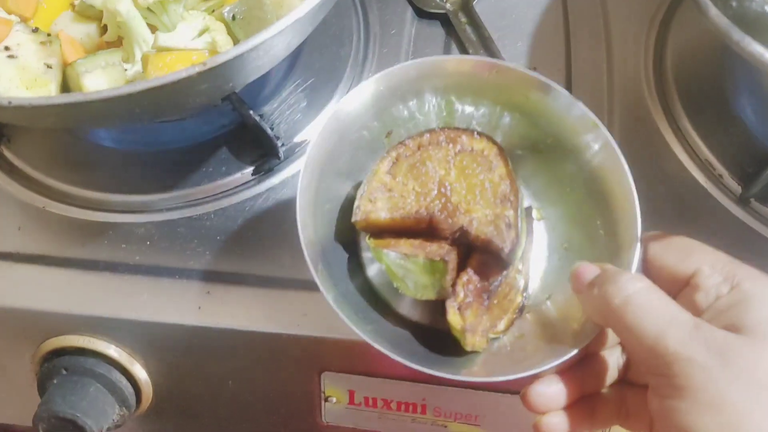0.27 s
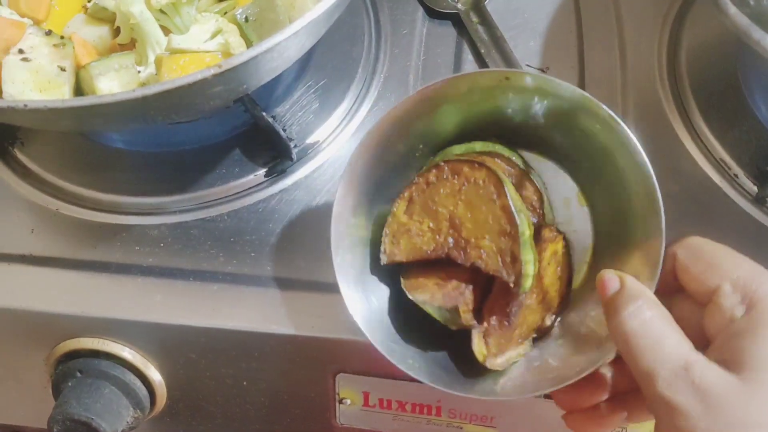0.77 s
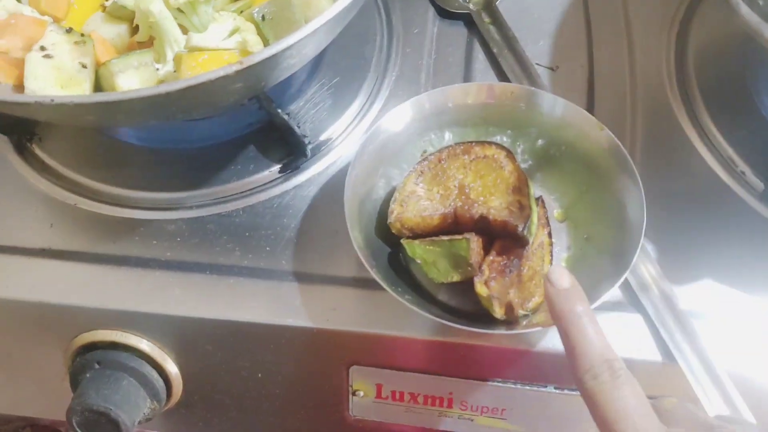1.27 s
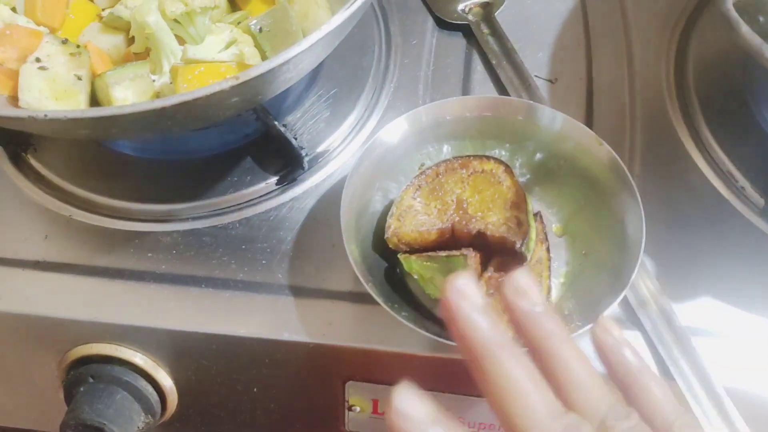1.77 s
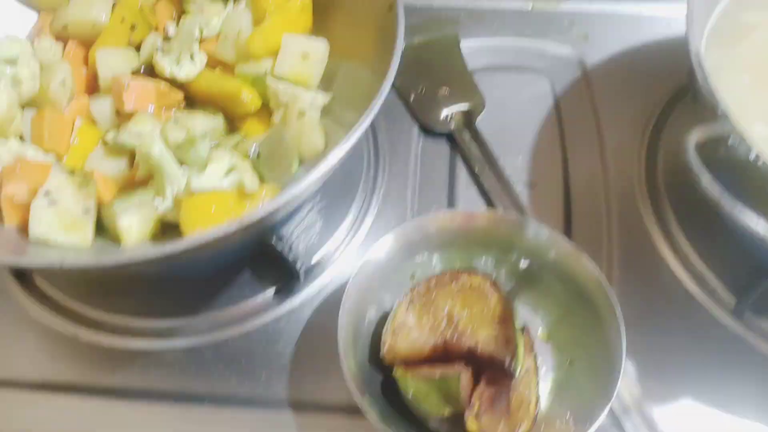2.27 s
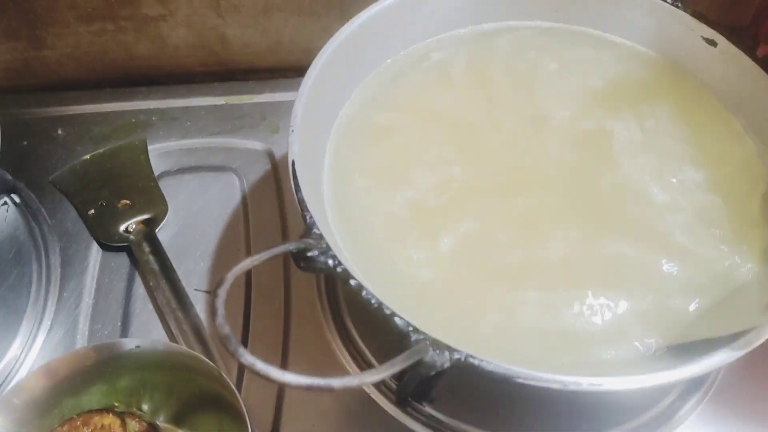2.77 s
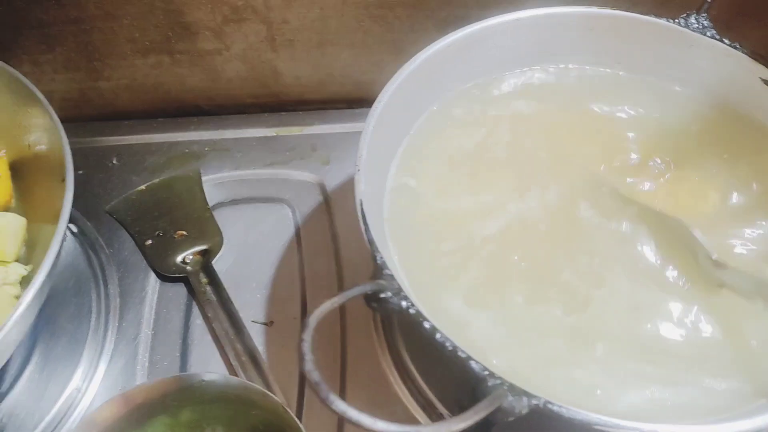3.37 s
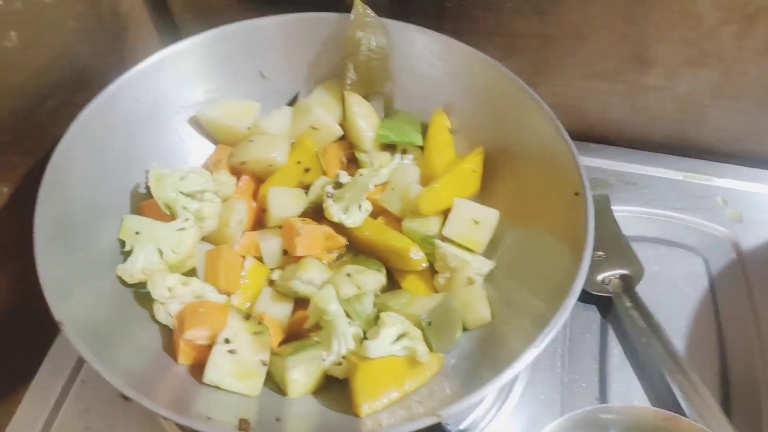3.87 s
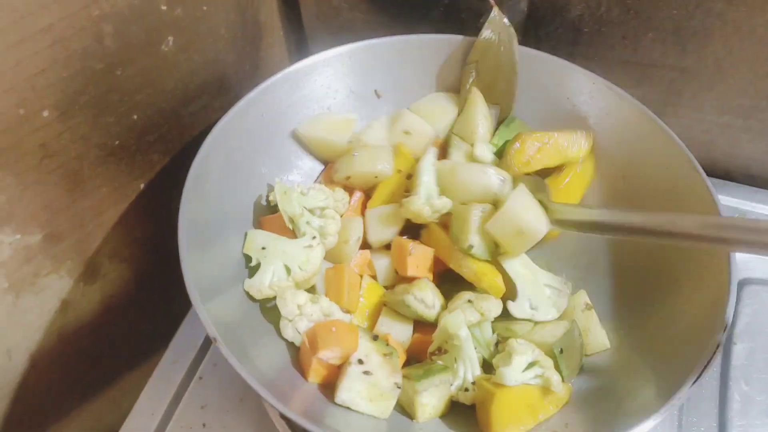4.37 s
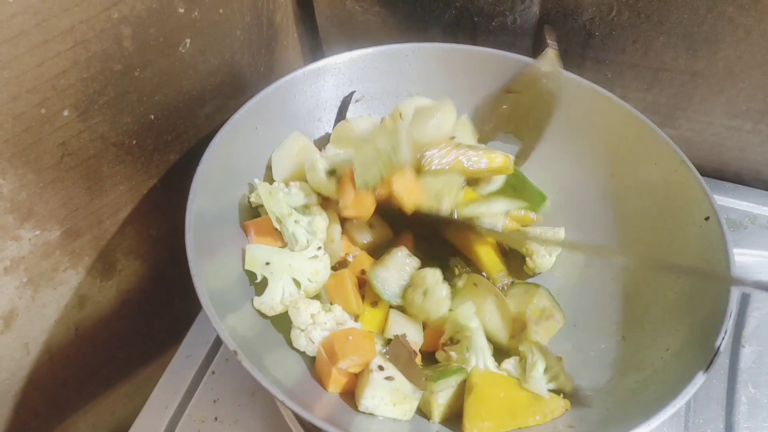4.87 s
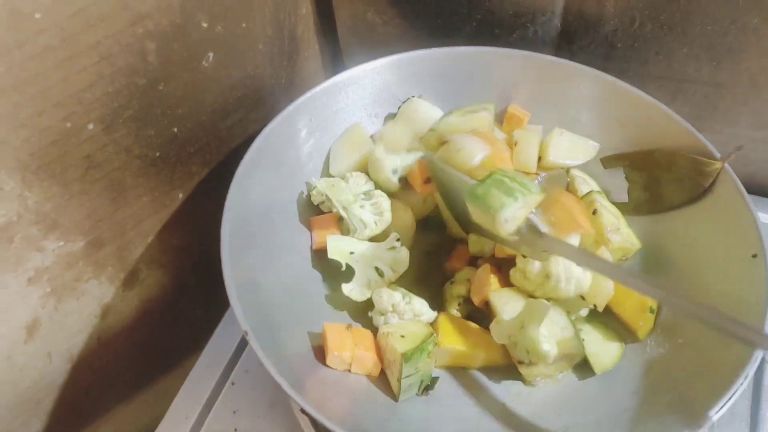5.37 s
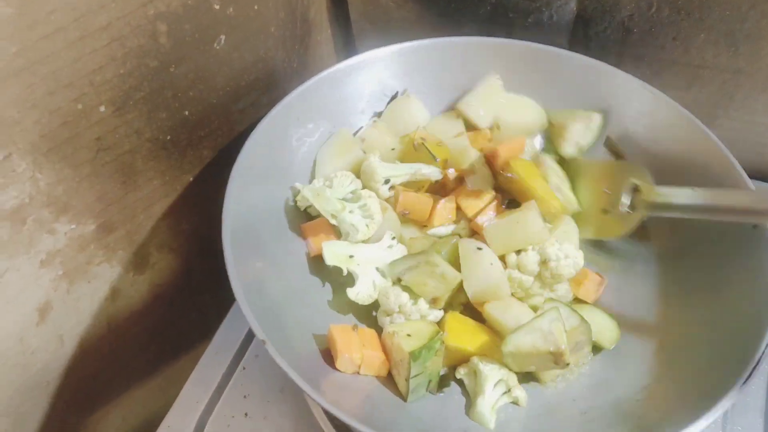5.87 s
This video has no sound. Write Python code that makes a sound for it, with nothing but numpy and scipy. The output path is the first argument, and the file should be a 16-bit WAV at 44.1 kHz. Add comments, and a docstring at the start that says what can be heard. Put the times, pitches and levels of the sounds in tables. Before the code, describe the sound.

Vegetables fizz and pop in hot oil while a steel bowl knocks on a hob and a spatula stirs a wok.

```python
"""Vegetables frying in a wok

Water in hot oil bursts in a fizz of tiny bubbles and louder pops; the fizz swells with the stirring.
A hand-held pair of microphones swings from a small bowl to a pot and on to the wok.
The bowl knocks on the steel hob, a ladle rubs the pot as its broth gulps, a handle pings once,
and a spatula rubs and taps the wok. Gas burners rumble underneath."""
import sys
import numpy as np
from scipy import signal
from scipy.fft import rfft, irfft
from scipy.io import wavfile
from scipy.ndimage import uniform_filter1d

SR = 44100
rng = np.random.default_rng(int(sys.argv[2]) if len(sys.argv) > 2 else 0)


def put_to_file(sound):
    """Save the sound as 16-bit audio at rate SR, in the file named by the first command-line argument."""
    columns = np.atleast_2d(sound).T  # one column per channel
    safe = np.clip(columns, -1, 1)
    whole_steps = np.round(safe * 32767)
    wavfile.write(sys.argv[1], SR, whole_steps.astype(np.int16))


N = 269539

# Levels in the tables are relative.
# Strength of the frying: (time [s], level [dB])
FIZZ_LEVEL = [(0.0, -35), (0.46, -38), (0.64, -40), (0.84, -40), (1.26, -35), (1.4, -37), (1.68, -38),
              (1.77, -31), (1.85, -36), (2.0, -38), (2.05, -39.5), (2.29, -38), (2.39, -39), (2.83, -39),
              (3.01, -42), (3.26, -41), (3.44, -39), (3.75, -37), (3.92, -31.5), (4.2, -31), (4.3, -29),
              (4.59, -23), (4.912, -22), (5.098, -18.5), (5.576, -19.5), (6.11, -18)]
# Large bubbles: (time [s], level [dB], pitch [Hz], snap weight [dB])
OIL_POPS = [(0.0396, -15.5, 2800, -7.5), (0.0606, -15, 4050, -21), (0.0743, -5.5, 3740, -10.5),
            (0.1376, -9.5, 3940, -33), (0.258, -21, 3100, -27), (0.2814, -16, 3960, -19),
            (0.3022, -19.5, 3900, -24), (0.3561, -22, 4080, -32), (0.3735, -21, 4150, -29),
            (0.398, -24, 4030, -13), (0.426, -21.5, 4100, -5), (0.4725, -20, 6100, -11),
            (0.4975, -24.5, 7000, -6), (0.5, -14.5, 3820, -13.5), (0.5467, -26.5, 2880, -21),
            (0.5648, -16, 6100, -15), (0.6062, -13, 4000, -11.5), (0.7712, -18, 2080, -29),
            (0.8607, -22, 6000, -21), (0.8928, -14.5, 2980, -18), (0.9073, -16.5, 3870, -12),
            (0.983, -22, 8650, -24), (1.0505, -24, 6020, -20), (1.072, -15, 3820, -11),
            (1.1329, -11, 3900, -26), (1.1527, -11, 3700, -32), (1.214, -13.5, 5800, -31),
            (1.2424, -23, 3020, -22), (1.2435, -12, 5340, -25), (1.2865, -14.5, 5000, -29),
            (1.2937, -14.5, 5100, -25), (1.305, -15, 6600, -34), (1.3443, -22.5, 5500, -26),
            (1.4023, -19, 3880, -18), (1.4349, -11.5, 6060, -23), (1.4468, -10.5, 4127, -9),
            (1.5047, -16.5, 4060, -30), (1.5474, -22, 6360, -13.5), (1.5699, -16, 5170, -37),
            (1.6125, -19, 5350, -34), (1.6306, -9.5, 6260, -25), (1.7055, -10, 7400, -13),
            (1.74, -12, 6070, -11), (1.7589, -10.5, 5280, -25.5), (1.775, -21, 7440, -15.5),
            (1.819, -18.5, 6040, -24), (1.8558, -20, 4650, -16), (1.914, -23.5, 4000, -23),
            (1.9423, -8.5, 5344, -14.5), (2.0009, -25.5, 7400, -21.5), (2.0202, -17, 6100, -27),
            (2.0303, -16.5, 5430, -12), (2.0726, -11.5, 4060, -23), (2.114, -23.5, 3873, -23.5),
            (2.2048, -18.5, 3700, -14.5), (2.2386, -9.5, 5870, -13), (2.2608, -28.5, 4034, -16),
            (2.304, -28.5, 3880, -14), (2.3296, -19.5, 4270, -29), (2.3552, -17.5, 2654, -26),
            (2.391, -15, 4900, -19), (2.4082, -12, 5860, -24.5), (2.4324, -11, 5380, -20.5),
            (2.586, -24.5, 7950, -11), (2.595, -21.5, 4394, -12), (2.6237, -17.5, 6300, -16),
            (2.6525, -9.5, 4280, -14), (2.7021, -6, 4460, -15.5), (2.7488, -11, 4400, -25),
            (2.7658, -7.5, 4730, -25), (2.7802, -15, 4630, -11), (2.833, -17, 2070, -20),
            (2.8888, -25, 2230, -18), (2.9562, -16, 5390, -24.5), (3.0195, -19.5, 5250, -17),
            (3.0904, -10, 5250, -18), (3.1313, -17, 6280, -14.5), (3.2026, -27, 2620, -9),
            (3.2192, -14, 2027, -16.5), (3.231, -16, 5300, -12.5), (3.275, -9.5, 4830, -25),
            (3.3031, -11, 5400, -18), (3.3774, -22, 6360, -7.5), (3.4491, -17.5, 4000, -25),
            (3.464, -13, 4320, -23.5), (3.4817, -10.5, 4330, -15.5), (3.5145, -15, 3430, -23),
            (3.5367, -7, 5064, -26.5), (3.5819, -14.5, 5170, -24), (3.613, -22, 4300, -18),
            (3.6969, -11.5, 4396, -23), (3.7228, -15.5, 5360, -18), (3.7932, -15, 4070, -16),
            (3.8237, -10, 6045, -18.5), (3.8504, -8, 5360, -31), (3.9103, -4, 2553, -33),
            (3.9414, -13.5, 6600, -17), (3.9513, -8.5, 4250, -22), (4.0183, -15, 5220, -21),
            (4.0374, -9.5, 5100, -16.5), (4.0612, -8, 6226, -26), (4.1077, -12, 4095, -32.5),
            (4.1197, -9, 3180, -28), (4.162, -18.5, 2160, -29), (4.1784, -18, 7280, -24),
            (4.2242, -9.5, 5450, -17), (4.272, -13, 5490, -18.5), (4.3097, -9.5, 5430, -19),
            (4.3488, -14, 3220, -21), (4.3683, -10.5, 3120, -19), (4.375, -7, 2140, -25),
            (4.428, -10.5, 5900, -14.5), (4.444, -0.5, 7370, -23), (4.5116, -8.5, 6537, -11.5),
            (4.5233, -3.5, 7250, -19.5), (4.5526, -7.5, 6023, -17.5), (4.5915, -9, 4000, -25),
            (4.6133, -5, 5550, -25), (4.6386, -9, 7640, -17.5), (4.657, -2, 8800, -30),
            (4.704, -10, 4046, -14), (4.7119, -8.5, 6170, -19.5), (4.749, -7, 6585, -25),
            (4.8073, -6, 4400, -23.5), (4.8592, -5, 3222, -20), (4.8928, -4.5, 4670, -21.5),
            (4.9294, -7.5, 6236, -17), (4.9734, -6, 6340, -14.5), (4.9999, -8.5, 6130, -18.5),
            (5.0504, -3.5, 5603, -17.5), (5.09, -5, 6600, -19), (5.188, -5, 6440, -15.5),
            (5.2099, -3.5, 4066, -17), (5.2514, -4.5, 5740, -15), (5.347, -8, 2670, -20),
            (5.38, -4.5, 5540, -17.5), (5.4147, -2.5, 4270, -18.5), (5.4625, -8.5, 2236, -15),
            (5.4875, -5.5, 3280, -20), (5.5116, -6.5, 5500, -15), (5.556, -3, 5110, -19),
            (5.5803, -5, 3220, -14.5), (5.6285, -4.5, 5270, -11), (5.6984, -4.5, 7200, -14.5),
            (5.7434, -1.5, 2940, -21.5), (5.765, -4.5, 5797, -18), (5.7873, -2, 9060, -12),
            (5.8356, -3, 5600, -38), (5.8862, -6, 5920, -28), (5.9046, -11, 5830, -18),
            (5.9238, -2.5, 6160, -19.5), (5.9708, -4.5, 4880, -16.5), (5.997, -7.5, 5430, -18),
            (6.0914, -3.5, 6400, -22)]
# Microphone aim: (time [s], vessel [0 bowl, 1 pot, 2 wok], left lag [ms], left minus right [dB])
MIC_AIM = [(0, 0, 0.25, -8), (2.3, 0, 0.2, -7.5), (2.42, 1, 0.31, -6.5), (3.6, 1, 0.33, -6.5),
           (3.8, 2, 0.06, -6), (4.5, 2, 0.04, -4.5), (6.11, 2, 0.03, -4)]
# Spectrum of the fizz at each aim: (frequency [Hz], level [dB])
BOWL_FIZZ = [(410, -92), (700, -31), (1090, -29), (1500, -21), (1950, -23.5), (2310, -27.5), (2840, -16.5),
             (3360, -22.5), (3700, -15.5), (3930, -10), (4180, -13.5), (4710, -20.5), (5100, -17.5),
             (6110, -15), (8450, -21), (9300, -28), (12200, -35), (15600, -30)]
POT_FIZZ = [(410, -59), (700, -49), (800, -14), (1390, -20.5), (2220, -8.5), (2810, -14), (3150, -13.5),
            (3360, -9), (3600, -16.5), (3980, -7), (4480, -9), (5800, -11.5), (6600, -9.5), (7350, -20.5),
            (8400, -19.5), (10000, -15.5), (11900, -26.5), (12700, -25), (15600, -28)]
WOK_FIZZ = [(410, -57), (660, -22.5), (797, -33), (907, -22.5), (1390, -12.5), (2160, -12.5), (2340, -14),
            (3240, -9), (5950, -8), (7500, -10.5), (10000, -19.5), (11700, -21), (15600, -19)]
# Imbalance of the fizz: (frequency [Hz], left minus right [dB])
LEFT_COLOUR = [(700, 9.5), (1300, 1.5), (2400, 5), (4400, -5), (8000, 2), (15000, 6)]
# Spectrum of a pop's snap against that of the fizz: (frequency [Hz], level [dB])
SNAP_COLOUR = [(700, -0.5), (2500, 1), (6000, -2.5), (12000, 9), (15600, 9.5)]
# Bowl striking the hob: (time [s], level [dB], hardness [0-1])
BOWL_KNOCKS = [(0.071, -23.5, 0.2), (0.603, -15, 0.46), (0.611, -15, 0.73), (0.635, -33, 0.1),
               (0.671, -36, 0.01), (0.769, -33.5, 0.5), (0.86, -17, 0.5), (0.868, -15.5, 0.63),
               (0.893, -29.5, 0.75), (0.924, -37, 1), (0.936, -13.5, 0.15), (0.961, -23, 0.4),
               (1.157, -28, 0.3), (1.164, -34.5, 1), (1.194, -37, 0.7)]
# Spatula striking the wok: (time [s], level [dB])
SPATULA_TAPS = [(4.348, -18), (4.4049, -14), (4.5353, -19), (4.555, -16.5), (4.6139, -15.5), (4.9756, -15),
                (5.2505, -10), (5.3228, -19), (5.3462, -10.5), (5.3624, -14), (5.4252, -12.5),
                (5.5543, -12), (5.744, -12), (5.7832, -11), (5.8642, -9), (5.904, -13), (5.9707, -10),
                (6.0152, -13), (6.0657, -11.5)]
# Modes of the hob plate and the loaded wok: (frequency [Hz], level [dB], T60 [s])
HOB_MODES = [(174, -12, 0.074), (255, 1, 0.064), (324.5, 5, 0.04), (420.6, -5.5, 0.13), (572, 3.5, 0.018),
             (672.6, 1.5, 0.062), (876, -2.5, 0.027), (1177, -11.5, 0.067), (1597, -11, 0.03)]
WOK_MODES = [(970.4, -13, 0.0087), (1340, -8, .014), (1790, -8, 0.011), (2132, -10.5, 0.012),
             (2760, -11.5, 0.021)]
# Strokes of the ladle, then the spatula: (time [s], length [s], rub level [dB], thud level [dB])
STROKES = [(3.126, 0.14, -44.5, -61), (3.304, 0.16, -41, -80), (3.432, 0.062, -48, -69),
           (3.634, 0.14, -50.5, -72), (4.323, 0.12, -41, -35.5), (4.43, 0.12, -43, -37.5),
           (4.61, 0.14, -60, -44), (4.877, 0.26, -49.5, -45), (5.104, 0.29, -46, -47.5),
           (5.343, 0.18, -42, -43.5), (5.51, 0.36, -40.5, -43.5), (5.792, 0.25, -48, -45.5),
           (5.996, 0.11, -49, -66)]
# Spectra of wall friction and tumbling food: (frequency [Hz], level [dB])
RUB_SPECTRUM = [(150, -39), (350, -1), (600, -1.5), (950, 6.5), (1300, 7.5), (1800, -17.5)]
THUD_SPECTRUM = [(50, -29), (120, -10.5), (220, -1.5), (320, -1), (600, -18)]
# Air pockets round the ladle: (time [s], level [dB], pitch [Hz])
BROTH_PLOPS = [(3.197, -35.5, 350), (3.372, -34, 903), (3.381, -33.5, 1200), (3.441, -29, 980)]
# Spectra of the flames and the gas jets: (frequency [Hz], level [dB])
FLAME_SPECTRUM = [(12, -33), (25, -39), (54, -30), (110, -8.5), (145, -2.5), (170, -1.5), (215, -13),
                  (330, -13.5), (1500, -31)]
JET_SPECTRUM = [(250, -43), (410, -6.5), (470, -4), (586, 1), (715, -12.5), (812, -8), (1400, -27.5),
                (2000, -10)]
# Strength of the burners: (time [s], flame level [dB], jet level [dB])
BURNER_LEVELS = [(0.0, -59, -50.5), (1.09, -56, -47), (1.43, -57, -48), (4.34, -58, -51.5),
                 (5.62, -63, -44), (6.11, -70, -62.5)]
# Response of the microphones: (frequency [Hz], gain [dB])
MIC_RESPONSE = [(1000, 1.5), (12300, 1), (14000, -9.5), (15500, -5)]

FIZZ_SPECTRA = [BOWL_FIZZ, POT_FIZZ, WOK_FIZZ]
SCATTER_DB = 4.5  # bursts lie up to this far left or right of the aim


def fizz(base_per_s=1300, pitches=20):
    """Shot noise: tiny steam bubbles burst in clumps, more often and higher the louder the frying."""
    _, _, pan_db = in_time(MIC_AIM)
    level_db = 10 * np.log10(from_db(2 * in_time(FIZZ_LEVEL)[0]) + sputter())
    vigour_db = level_db + 30
    rate = base_per_s * from_db(.6 * vigour_db + 2 * drift(30))
    draws = rng.random((N, 5))
    at = np.flatnonzero(draws[:, 4] < np.minimum(rate, 12000) / SR)
    strength, polarity, pitch, side, _ = draws[at].T
    height = from_db(2 * np.minimum(-np.log(strength), 4)) * np.sign(polarity - .5)
    pan_db = pan_db[at] + SCATTER_DB * (2 * side - 1)
    when, gains = arrivals(at / SR, height, pan_db, echo_db=-2.5, echo_ms=4.4, wander_ms=.11)
    low_bias = from_db(1.2 * drift(15)[at] - .15 * vigour_db[at])
    band = (pitches * pitch ** low_bias).astype(int)
    bubbles = 0
    for k, hz in enumerate(np.geomspace(1000, 14000, pitches)):
        clicks = impulses(when[band == k], gains[band == k])
        bubbles += (hz / 4000) ** 1.254 * bubble_burst(clicks, hz)
    bubbles[0] = colour(bubbles[0], LEFT_COLOUR)[0]
    out = sum(facing(k) * rms_one(colour(bubbles, spectrum)) for k, spectrum in enumerate(FIZZ_SPECTRA))
    running_rms = np.sqrt(uniform_filter1d(np.mean(out ** 2, axis=0), size=SR // 10))
    return from_db(level_db) * out / running_rms  # level independent of burst rate


def bubble_burst(clicks, hz, cycles=17):
    """Bubble resonance: a bright crack, then a brief ring at a pitch set by the bubble's size."""
    crack = signal.lfilter([1], [1, .5], clicks + 1e-18)
    return ring(clicks, hz, cycles / hz) + .06 * crack


def sputter(rise_s=.0034, t60=.15, flare_db=-23.5):
    """Exponential relaxation: each pop throws up droplets, so the fizz's power flares and sinks back."""
    times, level_db, _, _ = np.transpose(OIL_POPS)
    kicks = np.full(N, 1e-18)
    np.add.at(kicks, (times * SR).astype(int), from_db(2 * (level_db + flare_db)))
    rise, fall = np.exp(-1 / (rise_s * SR)), from_db(-120 / (t60 * SR))
    return signal.lfilter([1 - rise], np.convolve([1, -rise], [1, -fall]), kicks)


def pops(t60=.0028, ring_db=-3, snap_boost_db=28):
    """Impulse excitation: each large bubble bursts with a broad snap and a ring that swells and dies."""
    times, level_db, hz, snap_db = np.transpose(OIL_POPS)
    _, _, pan_db = in_time(MIC_AIM)
    pan_db = pan_db[(times * SR).astype(int)] + SCATTER_DB * rng.uniform(-1, 1, len(times))
    when, gains = arrivals(times, from_db(level_db), pan_db, echo_db=-7, echo_ms=6.7, wander_ms=.042)
    span = 1024
    rings = np.full((2, N + span), 1e-18)
    for k, first in enumerate(when.min(axis=(1, 2))):
        clicks = impulses(when[k:k + 1] - first, gains[k:k + 1], span)
        pop = ring(ring(clicks, hz[k], t60), hz[k], t60)
        peak = np.sqrt(np.mean(np.max(pop ** 2, axis=1)))
        rings[:, first:first + span] += from_db(level_db[k] + ring_db) * pop / peak
    out = highpass(rings[:, :N], 1000, order=3)
    snap_gains = gains * from_db(snap_db + snap_boost_db)[:, None, None]
    snaps = colour(impulses(when, snap_gains), SNAP_COLOUR)
    for k, spectrum in enumerate(FIZZ_SPECTRA):
        top_db = np.max(spectrum, axis=0)[1]
        out += from_db(-top_db) * colour(facing(k) * snaps, spectrum)
    return highpass(out, 500, order=2)


def bowl_knocks(contact_t60=.018, mode_db=-8):
    """Modal vibration: brief contact drives the hob plate; a harder knock favours higher modes."""
    times, knock_db, hardness = np.transpose(BOWL_KNOCKS)
    span, t = 2 * SR, np.arange(600) / SR
    swell = t * from_db(-60 * t / contact_t60)
    out = np.zeros((2, span))
    for hz, level_db, t60 in HOB_MODES:
        tilt_db = 12 * (hardness - .5) * np.log2(hz / 400)
        push_db = knock_db + level_db + tilt_db + mode_db + rng.normal(0, 1.5, len(times))
        clicks = np.zeros(span)
        clicks[(times * SR).astype(int)] = from_db(push_db)
        contact = 2 * swell / np.sum(swell) * np.sin(2 * np.pi * (hz * t + rng.random()))
        force = signal.oaconvolve(clicks, contact)[:span]
        mic_gains = from_db(rng.normal(0, 4.1, 2))
        out += np.outer(mic_gains, ring(force, hz, t60))
    return np.pad(highpass(out, 175, order=3), ((0, 0), (0, N - span)))


def spatula_taps():
    """Damped modes: each tap excites the wok's modes unequally, and the food soon stills them."""
    times, tap_db = np.transpose(SPATULA_TAPS)
    uneven_db = rng.normal(0, 3, (len(times), len(WOK_MODES)))
    out = 0
    for k, (hz, level_db, t60) in enumerate(WOK_MODES):
        clicks = np.bincount((times * SR).astype(int), from_db(tap_db + level_db + uneven_db[:, k]), N)
        out += (-1) ** k * ring(clicks, hz, t60)
    return out * from_db([[-1.5], [1.5]])  # a little to the right


def stirring(grit_db=2.2):
    """Friction noise: dense uneven contacts rub the vessel wall while tumbling pieces thud dully."""
    t = np.arange(N) / SR
    rub_gain = thud_gain = 0
    for start, length, rub_db, thud_db in STROKES:
        progress = np.clip((t - start) / length, 0, 4)
        stroke = 4 * progress ** 2 * np.exp(2 - 4 * progress ** 1.26)  # soft rise, slower fall
        rub_gain += from_db(rub_db) * stroke
        thud_gain += from_db(thud_db) * stroke
    contacts = rng.standard_normal((3, N)) * from_db(grit_db * drift(53))
    rub = rms_one(colour(contacts[0] + .89 * contacts[1:], RUB_SPECTRUM))
    thud = rms_one(colour(contacts[1] + .27 * contacts[::2], THUD_SPECTRUM))
    return rub_gain * rub + thud_gain * thud


def broth_plops(cycles=12):
    """Cavity resonance: air pockets in the broth close with a short low note."""
    out = 0
    for start, level_db, hz in BROTH_PLOPS:
        click, t60 = np.arange(N) == int(start * SR), cycles / hz
        note = ring(ring(click, hz, t60), hz, t60)
        out += from_db(level_db) * note / np.max(note)
    return out


def handle_ping(start_s=3.79, swell_s=.03, hold_s=.004, hz=1233, level_db=-31, t60=.075):
    """A single mode: a handle, brushed unevenly, swells on one note and then decays."""
    t = np.arange(N) / SR - start_s
    swell = np.clip(t / swell_s, 0, 1)
    decay = from_db(-60 * np.clip(t - swell_s - hold_s, 0, None) / t60)
    waver = from_db(2.5 * drift(60))
    return from_db(level_db) * swell * decay * waver * np.sin(2 * np.pi * hz * t)


def burners(width=.43, flutter_db=5):
    """Flow noise: flame rumble and the hum of the gas jets flutter, much alike at both microphones."""
    out = 0
    for spectrum, level_db in zip([FLAME_SPECTRUM, JET_SPECTRUM], in_time(BURNER_LEVELS)):
        noise = rng.standard_normal((3, N))
        flow = rms_one(colour(noise[0] + width * noise[1:], spectrum))
        out += from_db(level_db + flutter_db * drift(12.7)) * flow
    return out


def arrivals(times, height, pan_db, echo_db, echo_ms, wander_ms):
    """Multipath: a burst arrives directly and by four echoes off the steel; axes (burst, mic, path)."""
    at = (times * SR).astype(int)
    draws = rng.random((len(times), 2, 5, 2))
    late_ms = echo_ms * draws[..., 0] ** 2 + .2
    late_ms[:, :, 0] = wander_ms * draws[:, :, 0, 0]  # direct path
    late_ms[:, 0] += in_time(MIC_AIM)[1][at, None]  # left hears later
    gains = from_db(echo_db - 8 * late_ms / echo_ms) * (4 * draws[..., 1] - 2)
    gains[:, :, 0] = 1
    gains *= (height[:, None] * from_db(np.outer(pan_db, [.5, -.5])))[..., None]
    when = at[:, None, None] + (late_ms * SR / 1000).astype(int)
    return np.clip(when, 0, N - 1), gains


def kitchen(x, tail_db, t60=.12):
    """Reverberation: a short diffuse tail, different at each microphone."""
    t = np.arange(SR // 5) / SR
    tail = rng.standard_normal((2, len(t))) * from_db(tail_db - 60 * t / t60) * (t > .003)
    return x + signal.oaconvolve(x, tail, axes=1)[:, :N]


def facing(vessel):
    """Equal-power crossfade: a vessel's weight as the aim swings past it."""
    return np.sqrt(np.clip(1 - abs(in_time(MIC_AIM)[0] - vessel), 0, 1))


def impulses(when, gains, length=N):
    """Superposition: arrivals add into one click train per microphone."""
    return np.array([np.bincount(when[:, mic].ravel(), gains[:, mic].ravel(), length) for mic in (0, 1)])


def ring(clicks, hz, t60):
    """Damped oscillator: a unit click starts a decaying sine of height 1."""
    r, w = from_db(-60 / (t60 * SR)), 2 * np.pi * hz / SR
    return signal.lfilter([0, np.sin(w)], [1, -2 * r * np.cos(w), r * r], clicks + 1e-18)


def colour(x, spectrum):
    """Minimum-phase filtering: imposes a spectrum and keeps onsets sharp."""
    hz, db = np.transpose(spectrum)
    grid_hz = np.arange(1, 2050) * SR / 4096
    gain = from_db(np.interp(np.log(grid_hz), np.log(hz), db))
    cepstrum = irfft(np.log(gain))
    cepstrum[1:2048] *= 2
    cepstrum[2049:] = 0
    response = irfft(np.exp(rfft(cepstrum)))
    return signal.oaconvolve(np.atleast_2d(x), response[None], axes=1)[:, :N]


def highpass(x, hz, order):
    """Maximally flat bass cut."""
    return signal.sosfilt(signal.butter(order, hz, "high", fs=SR, output="sos"), x)


def drift(hz):
    """Random fluctuation: low-passed noise of unit rms."""
    r = np.exp(-2 * np.pi * hz / SR)
    return rms_one(signal.lfilter([1], [1, -2 * r, r * r], rng.standard_normal(N + SR))[SR:])


def in_time(rows):
    """Linear interpolation of a table's columns, one value per sample."""
    times, *columns = np.transpose(rows)
    return [np.interp(np.arange(N) / SR, times, column) for column in columns]


def from_db(db):
    """Decibels to gain."""
    return 10 ** (np.asarray(db) / 20)


def rms_one(x):
    """Normalisation to unit rms."""
    return x / np.sqrt(np.mean(x ** 2) + 1e-20)


def scene():
    """Superposition: all sources add at the two microphones."""
    out = kitchen(fizz(), tail_db=-29)
    out += kitchen(pops() + spatula_taps(), tail_db=-36)
    out += kitchen(bowl_knocks(), tail_db=-40)
    return out + stirring() + broth_plops() + handle_ping() + burners()


def record(dry, cutoff_hz=15600):
    """Saturation and band limiting: the microphones colour the sound, peaks clip, the top is cut."""
    clipped = np.clip(colour(dry, MIC_RESPONSE), -1, 1)
    lowpass = signal.ellip(12, .5, 70, cutoff_hz, fs=SR, output="sos")
    return np.clip(signal.sosfilt(lowpass, clipped), -1, 1)


dry = scene()
out = record(dry)
put_to_file(out)
```